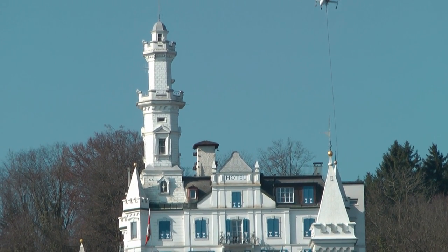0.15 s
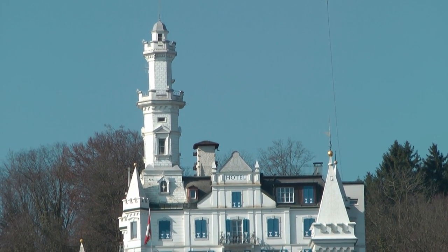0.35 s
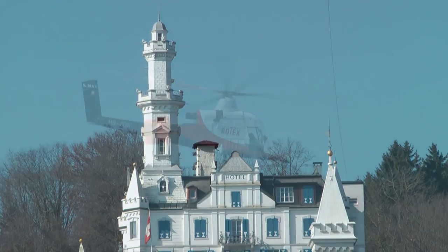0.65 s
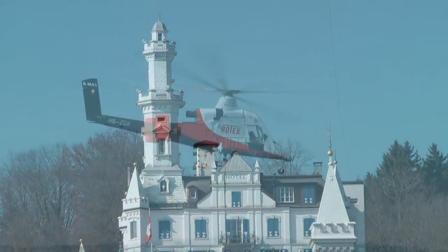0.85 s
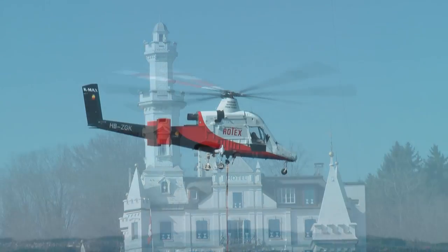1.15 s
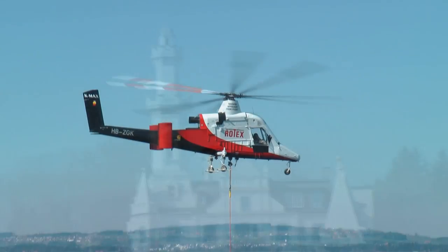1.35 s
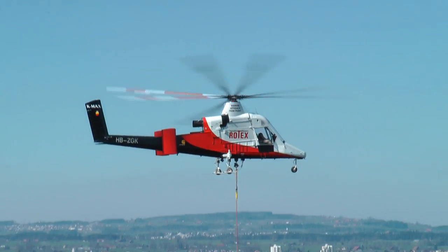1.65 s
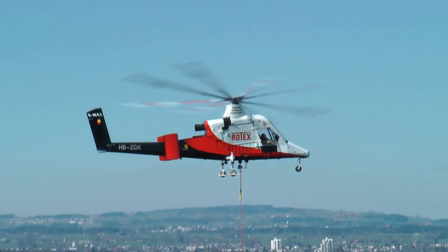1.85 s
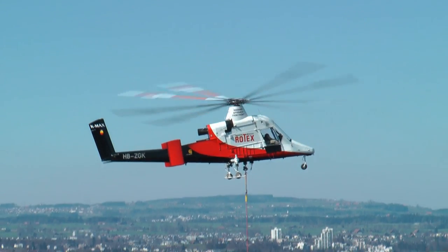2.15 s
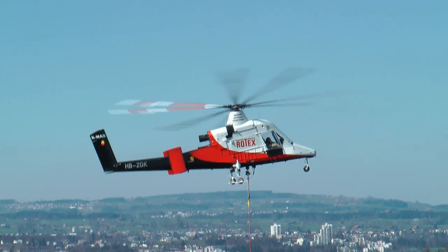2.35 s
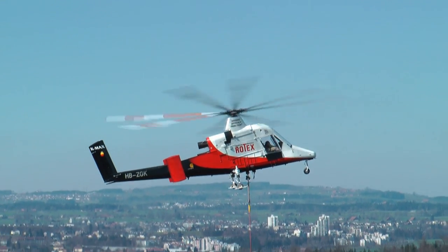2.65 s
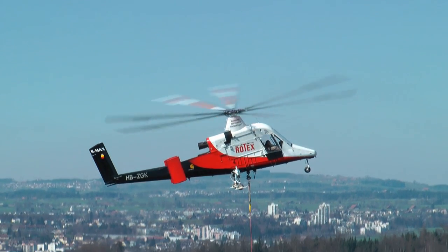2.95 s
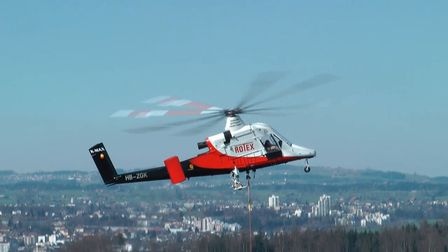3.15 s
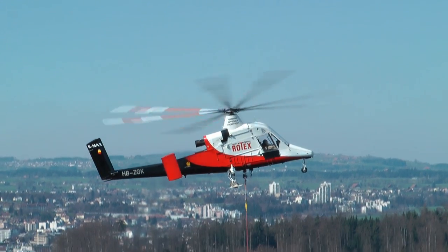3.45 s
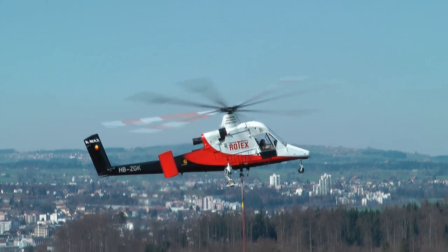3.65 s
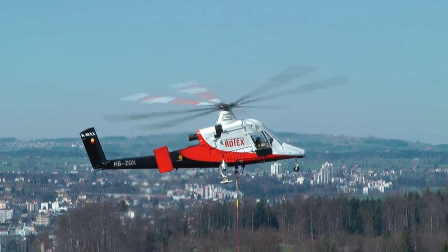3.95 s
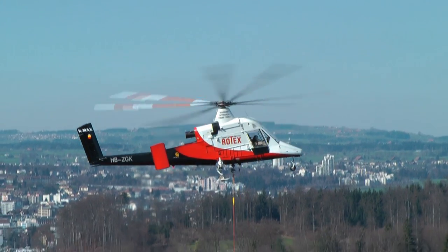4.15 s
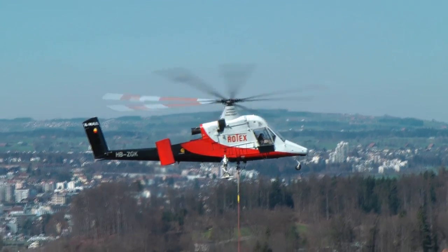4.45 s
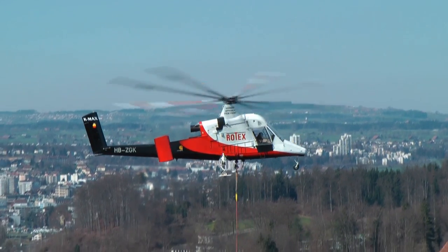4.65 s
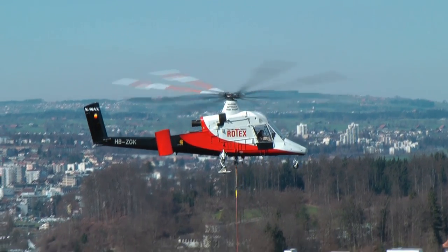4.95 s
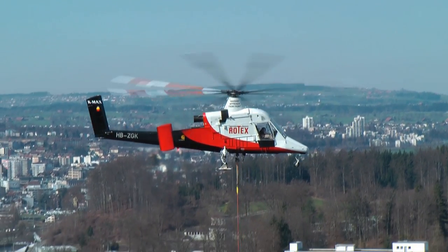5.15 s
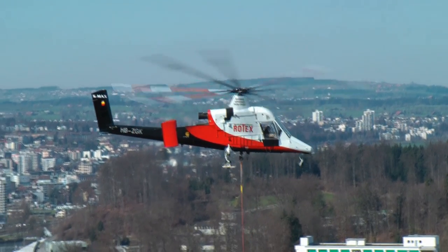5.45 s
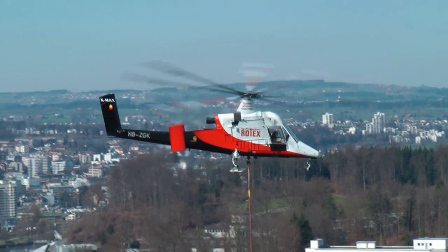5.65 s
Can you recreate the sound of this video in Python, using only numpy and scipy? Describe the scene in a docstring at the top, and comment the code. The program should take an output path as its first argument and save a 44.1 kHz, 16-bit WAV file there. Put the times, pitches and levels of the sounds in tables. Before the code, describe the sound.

A twin-rotor turbine helicopter hovers in the open air. At the start it is far away, a quiet, dull roar whose low end swells near 0.4 seconds. Between about 0.3 and 0.7 seconds small birds give a few faint, thin whistles and falling chirps. From about 0.8 to 1.8 seconds the distant sound blends smoothly into a close one, growing much louder and brighter. The blades beat about eighteen times a second, with slaps of uneven strength starting near 1 second and a swish sweeping through the broad roar of rotors and exhaust. A low rumble throbs irregularly underneath. The turbine's airy ringing is strongest around 2 seconds, and a slightly wavering, mid-pitched gear hum settles in by about 2.4 seconds. The close, chopping hover then holds at a steady loudness, with small surges, until the end at about 5.8 seconds.

```python
"""A twin-rotor turbine helicopter hovers in the open air, heard first from far off, then from close by.
Its blades pass about eighteen times a second, slapping into the wake and sweeping a swish through the
broad, turbulent roar of rotors and exhaust. The turbine rings, the gears hum and a low rumble throbs
irregularly; ground reflections cut narrow dips in the spectrum. Small birds call while the roar is
still far and dull, before that vantage point cross-fades into the near one."""
import sys
import numpy as np
from scipy import signal
from scipy.fft import rfft, irfft, next_fast_len
from scipy.io import wavfile

SR = 44100
rng = np.random.default_rng(int(sys.argv[2]) if len(sys.argv) > 2 else 0)


def wav_out(sig):
    """Save sig, one row per channel (or a flat mono array), as 16-bit PCM at SR to the path in sys.argv[1]."""
    wavfile.write(sys.argv[1], SR, np.round(np.clip(np.atleast_2d(sig).T, -1, 1) * 32767).astype(np.int16))


N = 256265
BLADE_HZ, BLADE_PHASE = 17.83, .1   # blade passing frequency; delay of the beat in blade periods


def from_db(db):
    """Amplitude ratio of a level in decibels."""
    return 10 ** (np.asarray(db) / 20)


def rms_one(x):
    """Normalisation to a root mean square of 1."""
    return x / np.sqrt(np.mean(x ** 2) + 1e-20)


def in_time(rows):
    """Linear interpolation in time: each column after the first, one value a sample."""
    times, *columns = np.transpose(rows)
    return [np.interp(np.arange(N) / SR, times, column) for column in columns]


def at_hz(points, hz):
    """Interpolation of a spectrum on a logarithmic frequency axis."""
    frequencies, levels = np.transpose(points)
    return np.interp(np.log(hz), np.log(frequencies), levels)


def add(out, start, sound):
    """Superposition of a short sound on out, from a start sample."""
    out[:, start:start + sound.shape[1]] += sound[:, :N - start]


def drift(corner_hz):
    """Random fluctuation of spread about 1: noise through two one-pole low-passes."""
    step = 40   # samples between draws
    pole = np.exp(-2 * np.pi * step * corner_hz / SR)
    noise = rng.standard_normal(N // step + 2002)
    slow = signal.lfilter([1], [1, -2 * pole, pole * pole], noise)[2000:]
    return np.interp(np.arange(N) / step, np.arange(len(slow)), rms_one(slow))


def resonance(x, hz, width_hz):
    """A damped two-pole resonator with unit gain at its peak."""
    r = np.exp(-np.pi * width_hz / SR)
    feedback = [1, -2 * r * np.cos(2 * np.pi * hz / SR), r * r]
    return signal.lfilter([(1 - r * r) / 2, 0, (r * r - 1) / 2], feedback, x)


def ringing(drive, hz, width_hz):
    """Forced response of two like resonators in series, scaled to rms 1."""
    return rms_one(resonance(resonance(drive, hz, width_hz), hz, width_hz))


def noise_bands(spectrum, count, gain_db):
    """Amplitude modulation by band: coloured stereo noise, each band following its own gain_db(hz)."""
    # Each row: frequency in Hz, level of the side signal against the mid in dB.
    side_db = [(25, -6), (60, -11), (120, -8.5), (260, -12), (530, -13), (1110, -12.5), (2300, -14.5),
               (4760, -15.5), (9860, -5.5)]
    # Each row: frequency in Hz, level of the left channel over the right in dB.
    left_db = [(60, -0.5), (140, 0.5), (330, 2), (770, 0), (1800, -1), (4210, -2), (9860, 0)]
    size = next_fast_len(N)
    hz = np.maximum(np.arange(size // 2 + 1) * SR / size, 1)
    mid, side = rfft(rng.standard_normal((2, size))) * from_db(at_hz(spectrum, hz))
    side = side * from_db(at_hz(side_db, hz))
    lean = from_db(at_hz(left_db, hz) / 2)
    pair = np.array([(mid + side) * lean, (mid - side) / lean]) / np.std(irfft(mid, size))
    low_hz, high_hz = spectrum[0][0], spectrum[-1][0]
    pair *= (hz > low_hz) & (hz < high_hz)
    centres = np.geomspace(low_hz, high_hz, count)
    place = np.interp(np.log(hz), np.log(centres), np.arange(count))
    out = np.zeros((2, N))
    for k, centre in enumerate(centres):
        triangle = np.maximum(1 - abs(place - k), 0)   # overlapping triangles add up to 1
        out += from_db(gain_db(centre)) * irfft(pair * triangle, size)[:, :N]
    return out


def ground_reflection(x):
    """Destructive interference: sound reflected off the ground cancels the direct sound in narrow dips."""
    # Each row: frequency in Hz, width in Hz, gain at the dip in dB.
    dips = [(130.7, 15, -11), (413.5, 27, -8.5), (933, 60, -2), (1420, 62, -2.5)]
    for hz, width_hz, db in dips:
        x = x - (1 - from_db(db)) * resonance(x, hz, width_hz)
    return x


def glide(length_s, pitches_hz):
    """Phase as the integral of frequency, along a parabola through start, middle and end pitch."""
    along = np.linspace(0, 1, int(length_s * SR))
    hz = np.polyval(np.polyfit([0, .5, 1], pitches_hz, 2), along)
    return 2 * np.pi * np.cumsum(hz) / SR


def birds():
    """Frequency modulation: thin whistles and falling harmonic chirps, echoed by nearby walls."""
    # Each row: start and length in seconds, start, middle and end pitch in Hz, level in dB.
    whistles = [(.290, .022, 5430, 5200, 5100, -70), (.325, .014, 5100, 5150, 5000, -70),
                (.360, .02, 3850, 3900, 4100, -69), (0.373, 0.07, 5100, 4800, 4500, -72),
                (0.447, .012, 4300, 4400, 4400, -68), (0.494, .036, 3550, 3760, 3250, -64),
                (0.546, .028, 3620, 3800, 3700, -65), (0.584, 0.036, 4100, 4520, 3900, -59),
                (.624, .036, 4250, 4450, 4450, -66), (.654, .024, 3650, 3520, 3500, -61),
                (.692, .022, 4100, 4150, 4350, -62)]
    # Each row: start of a chirp in seconds, level in dB.
    chirps = [(.436, -62), (.587, -58)]
    # The chirp's missing fundamental at its start, middle and end, in Hz.
    chirp_hz = [1090, 915, 750]
    # Each row: harmonic number, relative level in dB, length in seconds.
    partials = [(2, 10, .038), (3, 4, 0.018), (4, -2, 0.026), (5, -4, .018), (6, -12, .014)]
    # Each row: delay of an echo in seconds, gain in dB.
    echoes = [(.011, -12), (.023, -13), (.041, -18)]

    def tone(phase):
        return np.sin([phase]) * signal.windows.tukey(len(phase), .6)

    out = np.zeros((1, N))
    for s, length_s, *pitches_hz, db in whistles:
        add(out, round(s * SR), np.sqrt(2) * from_db(db) * tone(glide(length_s, pitches_hz)))
    chirp_phase = glide(.038, chirp_hz)
    for s, db in chirps:
        for harmonic, partial_db, length_s in partials:
            partial = tone(harmonic * chirp_phase[:int(length_s * SR)])
            add(out, round(s * SR), from_db(db + partial_db) * partial)
    out *= 1 + .4 * drift(500)   # husky flutter
    return out + sum(from_db(db) * np.roll(out, int(delay_s * SR)) for delay_s, db in echoes)


def far_roar():
    """Attenuation with distance leaves the roar dull and smooth; its lows swell before it fades."""
    # Each row: time in seconds, level in dB, lift below 330 Hz in dB.
    course = [(0, -43, -11), (.3, -43.2, -10), (.45, -44, 2), (.9, -48, 0), (1.3, -46, 0), (1.6, -92, 0)]
    # Each row: frequency in Hz, relative spectral density in dB.
    spectrum = [(76, -37), (130, -14), (170, -10.5), (280, -10.5), (390, -4), (445, -1), (495, -11),
                (1130, -8.5), (2500, -26), (3200, -31), (4500, -37.5), (5600, -46.5), (10600, -62)]
    level_db, low_db = in_time(course)
    roar = noise_bands(spectrum, count=12, gain_db=lambda hz: (hz < 330) * low_db + .7 * drift(9.5))
    return from_db(level_db) * roar


def rumble():
    """Low noise of the downwash, with a Gaussian tone burst for each irregular low throb in the rumble."""
    # Each row: time in seconds, level of the noise in dB.
    course = [(0.0, -51), (0.18, -49), (0.45, -41), (.8, -46), (1.5, -47), (3.09, -44), (4.16, -47.5),
              (5.24, -43), (5.81, -51.5)]
    # Each row: frequency in Hz, relative spectral density in dB.
    spectrum = [(8.8, -35.5), (15, -16), (27, -14), (81, -0.5), (97, -4), (124, -7.5), (135, -11),
                (180, -27), (300, -120)]
    # Each row: time of a throb's peak in seconds, level in dB, frequency in Hz.
    throbs = [(0.224, -48, 80), (0.409, -41, 80.5), (0.454, -50, 81), (0.494, -41, 81), (0.589, -38.5, 81),
              (0.693, -40, 87), (0.736, -46, 90), (0.808, -47, 95), (0.935, -45, 80), (0.981, -43, 93),
              (1.042, -45, 92), (1.114, -38, 84), (1.192, -43, 80), (1.28, -43, 84), (1.337, -44.0, 99),
              (1.412, -40, 97), (1.502, -45.3, 86), (1.573, -39.9, 87), (1.647, -46, 91), (1.799, -37, 86),
              (1.842, -52, 84), (1.9, -53, 91), (1.952, -36, 91), (2.035, -43.3, 91), (2.096, -50, 89),
              (2.143, -41.1, 88), (2.207, -36, 89), (2.258, -40.5, 90), (2.324, -38, 82),
              (2.402, -45.9, 89), (2.474, -34, 97), (2.541, -45, 89), (2.655, -44.9, 87), (2.705, -42, 94),
              (2.806, -39, 85), (2.876, -40.2, 89), (2.96, -36, 90), (3.114, -35, 89), (3.212, -43, 80.5),
              (3.279, -56, 92), (3.339, -44, 94), (3.439, -40.2, 92), (3.551, -34.5, 88.5),
              (3.667, -43, 90), (3.78, -39, 90), (3.885, -33.5, 84), (3.998, -41, 92), (4.115, -41, 93),
              (4.234, -39, 87), (4.394, -43.4, 92), (4.443, -46, 94), (4.505, -44, 85.5),
              (4.666, -43.1, 91), (4.712, -43, 87), (4.802, -52, 81), (4.901, -44, 83), (4.977, -38, 84),
              (5.022, -40, 91), (5.124, -41.0, 86), (5.166, -39, 80), (5.244, -36, 89), (5.292, -33, 79),
              (5.413, -36.5, 79), (5.515, -41, 79), (5.612, -49, 86), (5.67, -38, 89), (5.789, -37, 87)]
    out = from_db(in_time(course)[0]) * noise_bands(spectrum, count=3, gain_db=lambda hz: drift(8.5))
    spread_s = .011
    t = np.arange(-3 * spread_s, 3 * spread_s, 1 / SR)
    bell = np.exp(-.5 * (t / spread_s) ** 2)
    for s, db, hz in throbs:
        throb = bell * np.sin(2 * np.pi * (hz * t + rng.random()))
        add(out, round((s + t[0]) * SR), np.sqrt(2) * from_db(db) * throb[None])
    return out


def swish_db(rise_s=.02, fall_s=.023):
    """Directivity: the change in treble level, in dB, as blades sweep towards the listener."""
    # Each row: time of a sweep's peak in seconds, treble rise in dB.
    sweeps = [(0.96, -1), (1.023, 1), (1.09, 1.5), (1.154, 3), (1.19, 1), (1.375, 1), (1.457, 2),
              (1.578, 4), (1.698, 1), (1.805, 1), (1.873, 0.5), (1.926, 2), (2.059, 3), (2.13, 4.5),
              (2.185, 3), (2.365, 3.5), (2.48, 4), (2.59, 4.5), (2.7, 3.5), (2.811, 2.5), (2.92, 3.5),
              (2.95, 3), (3.031, 5), (3.151, 3.5), (3.251, 0), (3.521, 2), (3.63, 0.5), (3.742, 1),
              (3.851, 4.5), (3.981, 0.5), (4.079, 2), (4.197, 2), (4.295, 0), (4.37, 2.5), (4.402, 4),
              (4.445, 0), (4.506, 6.5), (4.619, 3), (4.728, 0.5), (4.875, 4), (4.957, 3), (5.066, 2),
              (5.216, 1.5), (5.292, 2.5), (5.4, 0), (5.537, 4), (5.606, 1), (5.728, 2.5)]
    t = np.arange(N) / SR
    return sum(db * np.exp(-.5 * ((t - s) / np.where(t < s, rise_s, fall_s)) ** 2) for s, db in sweeps)


def engine():
    """Noise-driven resonances of the turbine, modulated by the blades, and a wavering gear hum."""
    # Each row: frequency of a resonance in Hz, width in Hz, level in dB.
    modes = [(555, 66, -42.5), (1050, 154, -41), (1035, 60, -53), (1725, 18, -54.5), (3765, 400, -47.5),
             (4350, 450, -47.5)]
    # Each row: time in seconds, gain of all the resonances in dB.
    ring_course = [(.5, -29), (.9, -15.5), (1.5, -6), (1.8, 1.5), (2.2, 1), (2.9, -5.5), (3.4, -15.5),
                   (4.4, -5.5), (5.0, -7), (5.81, -10)]
    # Each row: time in seconds, frequency of the hum in Hz, level in dB.
    gear_hum = [(.6, 406, -81), (1.4, 426, -75), (2.4, 395, -44.5), (3.3, 402.3, -44), (3.9, 397.5, -43.5),
                (4.8, 402.6, -48.5), (5.81, 400.6, -47)]
    rings = sum(from_db(db + 3.6 * drift(14)) * ringing(rng.standard_normal(N), hz, width_hz)
                for hz, width_hz, db in modes)
    hum_hz, hum_db = in_time(gear_hum)
    hum_phase = 2 * np.pi * np.cumsum(hum_hz) / SR
    hum = np.sqrt(2) * from_db(hum_db + .92 * drift(11)) * np.sin(hum_phase)
    return from_db(in_time(ring_course)[0] + .88 * swish_db()) * rings + hum


def blade_push():
    """Loading noise: a pressure pulse per blade, the two rotors pushing in opposite sense, one harder."""
    # Each row: time in seconds, level in dB.
    course = [(.6, -73), (1.5, -59), (2.5, -45.5), (3.5, -45), (4.1, -47), (4.6, -46.5), (4.9, -45.5),
              (5.81, -57)]
    # Each row: frequency of a band of the pulse in Hz, width in Hz, gain in dB.
    pulse_bands = [(95, 39, -9.5), (206.3, 51, 4.5)]
    lead, jitter = .08, .02   # in blade periods: ahead of the beat, timing spread
    imbalance, waver_db = .5, 1.2
    passes = np.arange(1, int(N / SR * BLADE_HZ))
    timing, strength = rng.standard_normal((len(passes), 2)).T
    times = (passes + BLADE_PHASE - lead + jitter * timing) / BLADE_HZ
    impulses = np.zeros(N)
    impulses[(times * SR).astype(int)] = ((-1) ** passes - imbalance) * from_db(waver_db * strength)
    pulses = sum(from_db(db) * ringing(impulses, hz, width_hz) for hz, width_hz, db in pulse_bands)
    return from_db(in_time(course)[0]) * pulses


def near_roar():
    """Turbulence of rotors and exhaust, modulated by the blades: the lows beat, the treble swishes."""
    # Each row: time in seconds, level in dB, tilt above 500 Hz in dB per octave, bass lift in dB.
    course = [(.15, -55, -5.5, 4), (.35, -51, -6, 5), (0.6, -47, -3, 8), (.9, -40.5, -0.5, 8),
              (1.09, -40, 1, 7.5), (1.27, -34, 0, 1), (1.55, -32.5, .5, 0.5), (1.83, -28.5, 0, -1),
              (2.08, -30, 0.5, -2.5), (2.3, -29, 0, -3.5), (2.6, -32, 0, -0.5), (3.04, -28.5, -.5, 0),
              (3.21, -31.5, 0.5, -0.5), (3.6, -32, -1, 1.5), (4.0, -31, -0.5, 1.5), (4.31, -33, 0.5, 5.5),
              (4.65, -28.5, 0, -1.5), (5.14, -31.5, -1, 2), (5.47, -28.5, -0.5, -1.5),
              (5.81, -31.5, 0, 2.5)]
    # Each row: frequency in Hz, relative spectral density in dB.
    spectrum = [(76, -40), (135, -11.5), (200, -3), (380, -2.5), (450, -5), (1210, -8), (2180, -12.5),
                (2860, -16), (4400, -19), (5240, -27), (6410, -24), (7280, -30), (8300, -41), (10600, -52)]
    level_db, tilt, body_db = in_time(course)
    t = np.arange(N) / SR
    phase = 2 * np.pi * (BLADE_HZ * t - BLADE_PHASE)
    beat_db = .44 * (np.cos(phase) + 1.6 * np.cos(2 * phase))   # a weaker chop falls between blades
    treble_db = swish_db()
    from_lull = (BLADE_HZ / 2 * t - .87 + .5) % 1 - .5   # the lows sink once in every two beats
    lull_db = 3 * np.exp(-.5 * (from_lull / .06) ** 2)
    gust_db = .6 * drift(7.5) + .6 * drift(38)   # shared by all bands

    def gain_db(hz):
        treble_share = np.clip(np.log2(hz / 350) / 2.7, 0, 1)
        bass_share = np.clip(np.log2(450 / hz), 0, 1)
        colour_db = tilt * np.log2(max(hz, 500) / 900) + bass_share * (body_db - lull_db)
        blade_db = treble_share * treble_db + (1 - treble_share) * beat_db
        flicker_db = .8 * drift(30) + .3 * drift(1.15)
        return colour_db + blade_db + gust_db + flicker_db
    return from_db(level_db) * noise_bands(spectrum, count=12, gain_db=gain_db)


def puff(s, spread_s, hz, edge_ratio, crackle_db):
    """Spiky band-limited noise under a Gaussian envelope centred on s: start sample and stereo sound."""
    half = int(3 * spread_s * SR)
    bell = np.exp(-.5 * (np.arange(-half, half) / (spread_s * SR)) ** 2)
    band = signal.butter(2, [hz / edge_ratio, hz * edge_ratio], "band", fs=SR, output="sos")
    noise = rng.standard_normal((2, 2400)) * from_db(crackle_db * rng.standard_normal(2400))
    mid, side = signal.sosfilt(band, noise)[:, 800:800 + 2 * half] * bell
    pair = mid + from_db(-19) * side * np.array([[1], [-1]])
    centre_rms = np.sqrt(np.sum(mid ** 2) / np.sum(bell ** 2))
    return round(s * SR) - half, pair / centre_rms


def thump(s, hz, pitch_fall=.3):
    """A wave packet of a few cycles, centred on s and falling in pitch: start sample and pressure pulse."""
    cycles = np.arange(-3, 3, hz / SR)
    phase = 2 * np.pi * (cycles - pitch_fall * cycles ** 2 / 6 + rng.random())
    bell = np.exp(-.5 * cycles ** 2)
    return round(s * SR) - len(cycles) // 2, np.sqrt(2) * bell * np.cos([phase])


def blade_slaps():
    """Blade-vortex interaction: a blade meets a wake with crackling air, a clean pulse and a crack."""
    # Each row: time in seconds, level in dB, centre frequency in Hz, relative level of the crack in dB.
    slaps = [(0.964, -34, 350, -8), (1.05, -35, 308, -14), (1.075, -35, 700, -1.5), (1.125, -35, 337, -4),
             (1.235, -26, 380, -11), (1.35, -25, 350, -22), (1.375, -29, 350, -11), (1.409, -31.5, 800, 2),
             (1.462, -31.5, 370, 3), (1.571, -25.5, 487, -9), (1.63, -32, 900, 2), (1.684, -17.5, 545, -16),
             (1.697, -29, 303, -6), (1.754, -24, 332, -4), (1.802, -28.5, 452, -4), (1.92, -25, 450, -4),
             (2.02, -22, 1000, -4.5), (2.132, -27, 760, -9), (2.145, -30, 312, -10), (2.207, -27, 309, -11),
             (2.249, -26.5, 340, 0), (2.359, -39, 609, 6), (2.466, -27.5, 700, -1), (2.474, -24, 266, -18),
             (2.536, -26, 260, -20), (2.581, -30, 537, 1), (2.698, -28, 248, -3), (2.758, -34, 267, -20),
             (2.803, -26.5, 630, -3), (2.862, -29, 280, -20), (2.916, -20.5, 570, -18),
             (2.981, -33, 273, -20), (3.03, -22, 695, -5), (3.095, -36, 282, -20), (3.138, -26, 900, -2.5),
             (3.145, -25.5, 900, 2), (3.215, -24, 320, -20), (3.253, -24.5, 900, -2),
             (3.259, -20.5, 840, -13), (3.314, -25, 300, -23), (3.364, -25.5, 296, -0.5),
             (3.373, -23.5, 750, -4), (3.442, -27.5, 260, -24), (3.477, -21, 280, -11),
             (3.486, -29, 895, 0), (3.54, -25, 350, -21), (3.601, -24, 480, -3.5), (3.629, -28, 340, -15),
             (3.668, -23, 433, -24), (3.704, -36, 336, -6), (3.762, -36, 259, -20), (3.814, -24, 312, -16),
             (3.874, -26.5, 510, -4), (3.929, -20, 394, -24), (3.961, -25, 317, -20),
             (3.991, -24.5, 330, -24), (4.05, -28, 282, -15), (4.074, -27, 342, -13),
             (4.102, -25, 264, -11), (4.186, -25.5, 287, -7), (4.214, -21, 260, -14),
             (4.292, -21, 352, -13), (4.333, -31, 240, -17), (4.407, -23.5, 343, -20),
             (4.447, -30, 230, -10), (4.515, -28, 293, -7), (4.549, -26, 231, -16),
             (4.601, -23.5, 615, -15), (4.623, -25, 252, -15), (4.656, -27, 266, -3), (4.717, -26, 325, -9),
             (4.736, -21, 298, -14), (4.776, -30, 278, -16), (4.828, -20.5, 393, -9),
             (4.887, -24, 382, -16), (4.939, -24, 326, -22), (5.002, -28.5, 345, -1),
             (5.054, -23, 328, -15), (5.072, -23.5, 290, -12), (5.11, -22.5, 332, -5),
             (5.211, -32, 288, -15), (5.223, -24, 780, -16), (5.277, -28, 295, -6),
             (5.334, -28.5, 318, 2.5), (5.392, -37, 300, -11), (5.438, -25, 315, -10),
             (5.446, -24.5, 895, -3), (5.504, -24, 250, -24), (5.562, -24, 381, -16), (5.61, -22, 560, -10),
             (5.674, -22.5, 750, -9), (5.727, -19.5, 370, -17), (5.785, -24, 500, -6)]
    air_db, pulse_db = -7.0, -3.45   # against the slap's level
    out = np.zeros((2, N))
    for s, db, hz, crack_db in slaps:
        start, air = puff(s, spread_s=.0035, hz=hz, edge_ratio=1.62, crackle_db=9.5)
        add(out, start, from_db(db + air_db) * air)
        start, pulse = thump(s, hz)
        add(out, start, from_db(db + pulse_db) * pulse)
        start, crack = puff(s, spread_s=.003, hz=970, edge_ratio=1.52, crackle_db=4.5)
        add(out, start, from_db(db + crack_db) * crack)
    return signal.sosfilt(signal.butter(4, 3500, fs=SR, output="sos"), out)   # the air dulls the edge


def scene():
    """Superposition of the rotor noise and rumble, notched by the ground, with engine and birds."""
    direct = near_roar() + far_roar() + blade_slaps() + blade_push() + rumble()
    return ground_reflection(direct) + engine() + birds()


def record(dry):
    """Band limiting: a steep elliptic low-pass cuts the top of the spectrum."""
    cutoff_hz = 10465
    return signal.sosfilt(signal.ellip(12, .5, 70, cutoff_hz, fs=SR, output="sos"), dry)


dry = scene()
out = record(dry)
wav_out(out)
```